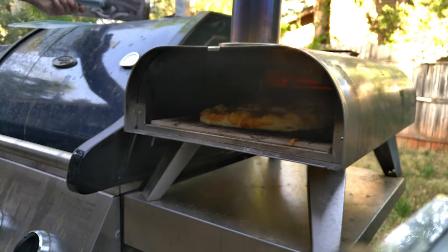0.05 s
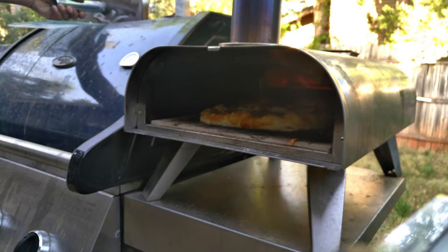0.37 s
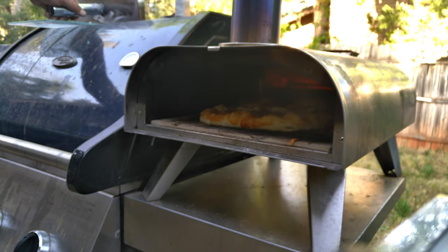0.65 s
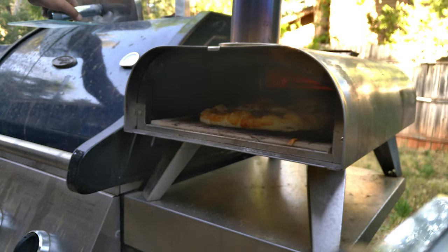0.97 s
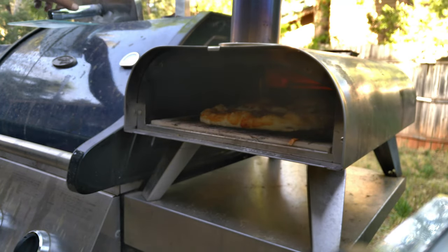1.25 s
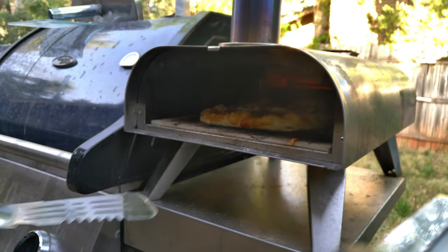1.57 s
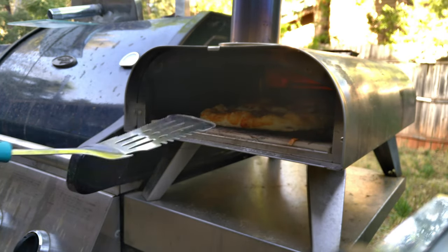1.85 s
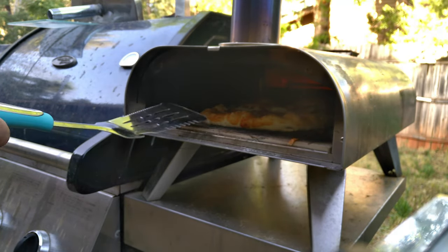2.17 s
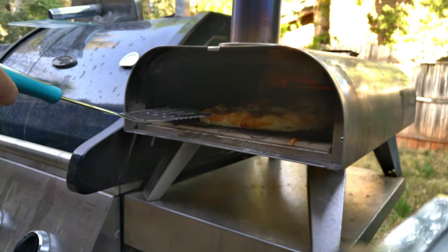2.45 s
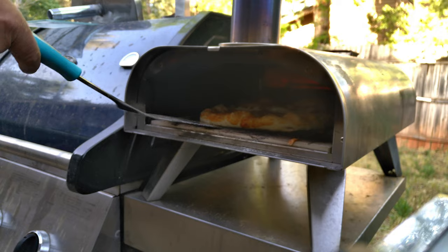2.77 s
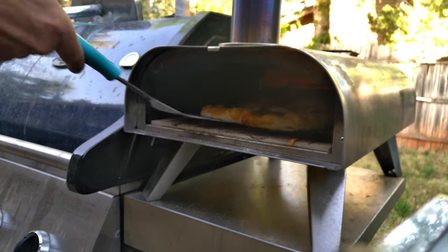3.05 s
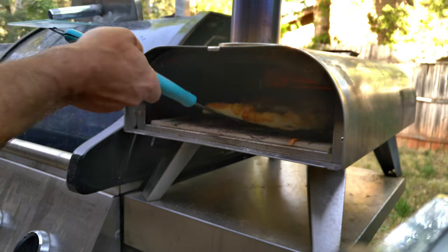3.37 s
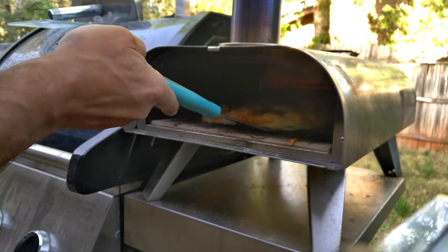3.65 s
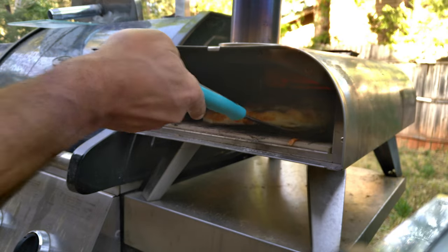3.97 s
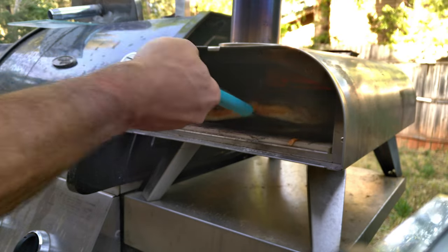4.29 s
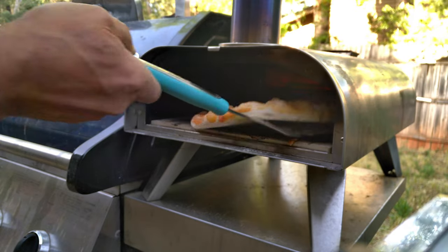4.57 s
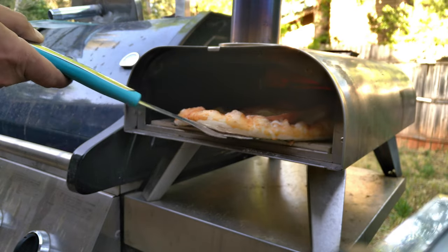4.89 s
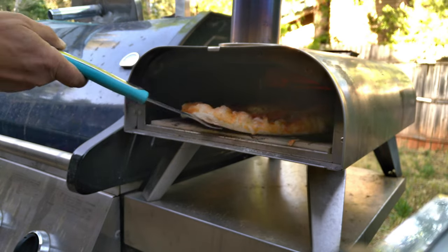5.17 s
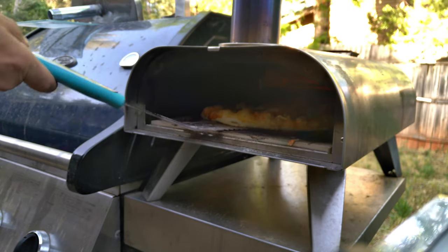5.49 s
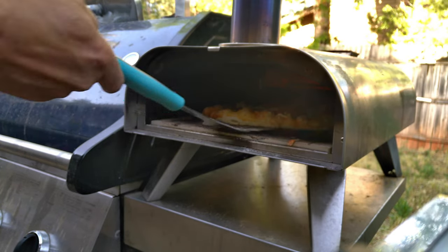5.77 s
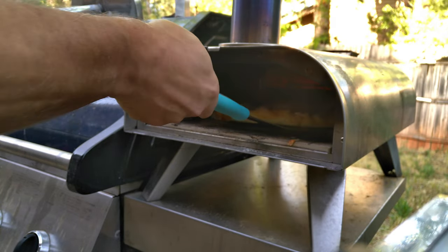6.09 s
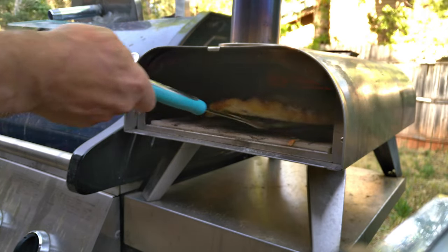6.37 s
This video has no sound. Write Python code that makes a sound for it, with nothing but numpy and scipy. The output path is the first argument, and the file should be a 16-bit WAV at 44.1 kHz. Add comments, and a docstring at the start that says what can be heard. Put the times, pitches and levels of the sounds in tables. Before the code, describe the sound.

A metal spatula scrapes and clanks twice on a steel grill, then scrapes inside a small pizza oven and bangs its shell.

```python
"""Outdoors at a small steel pizza oven. A metal peel drags over the grill beside it and clanks twice
on sheet metal: body, then lid. Its thin blade taps the oven's mouth, scrapes over the gritty floor
under the pizza, bangs the shell once, slides out and goes in again. Slides, shoves and catches drive
the blade; its resonances shift with what it bears on. Faint garden air throughout."""
import sys
import numpy as np
from scipy import signal
from scipy.fft import rfft, irfft, next_fast_len
from scipy.io import wavfile
from scipy.ndimage import uniform_filter1d, map_coordinates

SR = 44100
rng = np.random.default_rng(int(sys.argv[2]) if len(sys.argv) > 2 else 0)


def unload_wav(signal):
    """Save mono or channel-first audio to the path in sys.argv[1] as 16-bit WAV at rate SR, clipped to [-1, 1]."""
    wavfile.write(
        sys.argv[1],
        SR,
        np.round(np.clip(np.atleast_2d(signal).T, -1, 1) * 32767).astype(np.int16),
    )


N = 283563
TIME_S = np.arange(N) / SR
TOP_HZ = 15650

# friction spectrum: (frequency [Hz], level [dB])
FRICTION = [(100, -19.5), (280, -6.5), (600, -5), (1500, -12), (2200, -3.5), (9500, -5), (12000, -1),
            (14700, 7), (15600, 0)]
# even-paced slides: (start [s], end [s], blade [dB], hiss [dB])
SLIDES = [(0, 0.16, -45.5, -44), (0.191, 0.5, -49.5, -47), (0.595, 0.9, -60.5, -55.5),
          (1.763, 1.843, -77, -66.5), (1.904, 2.14, -74.5, -66), (2.125, 2.36, -73, -60),
          (2.283, 2.387, -64, -48.5), (2.671, 3.04, -48, -38.5), (3.049, 3.27, -42, -37),
          (3.28, 3.55, -55, -48.5), (3.636, 3.72, -43.5, -38.5), (3.724, 4.2, -57.5, -50),
          (4.033, 4.09, -50, -51), (4.236, 4.34, -56.5, -52.5), (4.448, 4.58, -59, -63.5),
          (4.715, 5.03, -66, -62.5), (5.083, 5.11, -42, -52), (5.192, 5.47, -57.5, -63),
          (5.69, 5.8, -72, -68), (5.853, 5.925, -54.5, -49), (5.986, 6.11, -62.5, -51.5),
          (6.163, 6.36, -76, -66)]
# the hand leans in until the blade slips: (slip time [s], blade [dB], hiss [dB])
SHOVES = [(2.732, -40.5, -55), (3.07, -34, -27), (4.138, -46, -38), (4.321, -54.5, -43.5),
          (5.418, -44.5, -52.5), (6.08, -68, -43), (6.289, -70.5, -58.5)]
# the edge catches: (time [s], relative hiss [dB], relative blade [dB])
CATCHES = [(0.186, -24, -71), (0.467, -21, -46), (0.552, -22, -37), (0.571, -14, -36), (0.592, -19, -39),
           (1.708, -46, -44.5), (2.106, -58, -63.5), (2.253, -42, -73), (2.292, -30.5, -59),
           (2.569, -41, -87), (2.381, -46, -61), (2.655, -29, -28), (3.156, -19, -33.5), (3.227, -22, -37),
           (3.67, -24, -33.5), (3.874, -31, -37.5), (4.308, -28, -48.5), (5.053, -65, -33.5),
           (5.312, -62, -46.5)]

# blade resonances per contact: (centre [Hz], width [Hz], lift [dB])
ON_GRILL = [(2400, 1650, 11.5), (6300, 2050, 14), (14400, 3500, 15)]
ALONG_GRILL = [(2450, 1800, 9.5), (4500, 680, 11.5), (6600, 1100, 8), (14240, 3500, 22)]
ON_GRILL_LID = [(530, 44, 33), (1420, 230, 25), (3500, 10000, 16), (14200, 5200, 17)]
ONTO_LIP = [(4010, 890, 12.5), (9300, 2730, 2.9)]
ON_LIP = [(1322, 110, 21), (3670, 1040, 13.2), (6800, 4300, 19)]
TIP_DOWN = [(391, 98, 23), (636, 80, 29), (1172, 146, 22), (1990, 120, 13.6), (2600, 170, 10),
            (6800, 900, 6.5)]
GLIDING = [(396, 150, 15.5), (650, 62, 23.6), (4480, 1500, 19.6), (6560, 2300, 22), (8640, 2400, 16.4)]
FLAT_ON_FLOOR = [(354, 58, 22), (638, 200, 17.7), (1100, 76, 27.8), (2700, 540, 3.3), (5870, 1900, 4),
                 (8720, 910, 9.8)]
UNDER_CRUST = [(420, 140, 7.1), (2840, 770, 7.3), (4560, 1300, 11.2), (6290, 1730, 20), (8700, 2400, 14.5)]
PUSHED_HOME = [(413, 80, 9.9), (967, 50, 17), (2600, 590, 5.5), (5120, 2300, 10.3), (8550, 1200, 13.7)]
LOADED = [(2370, 1560, 11.2), (4200, 770, 14), (5100, 660, 12), (7000, 540, 15), (8420, 910, 15.7),
          (14000, 680, 2.3)]
LIFTING = [(2340, 420, 11.6), (4970, 1200, 20), (8600, 1500, 16.3), (11000, 1000, 10), (14200, 1000, 7.6)]
HELD_UP = [(2240, 340, 24), (4100, 400, 10), (4960, 550, 15), (8800, 750, 18)]
DRAWN_BACK = [(534, 490, 27.7), (1280, 280, 22.6), (2260, 770, 21), (3940, 1400, 8.8), (6720, 1000, 11.4),
              (12000, 2400, 7.4)]
LEAVING = [(1210, 320, 10), (2070, 330, 16), (2580, 360, 16.5), (4780, 2700, 11.7), (6960, 740, 4.5),
           (10700, 1300, 9.4)]
GOING_BACK_IN = [(2430, 620, 19), (4570, 320, 15.8), (6000, 1700, 9.8)]
NOSING_UNDER = [(2700, 710, 13.3), (5540, 590, 9.7), (6830, 1300, 12.5), (12960, 2200, 10)]
# contact sequence: (start [s], hollow register gain [dB], resonances)
CONTACTS = [(0, -18, ON_GRILL), (.2, -6, ALONG_GRILL), (.41, 7.5, ON_GRILL_LID), (1.499, 2, ONTO_LIP),
            (2.14, -3.5, ON_LIP), (2.643, -1.5, TIP_DOWN), (2.82, -10.5, GLIDING),
            (2.982, -6.5, FLAT_ON_FLOOR), (3.299, -18.5, UNDER_CRUST), (3.6, -16, PUSHED_HOME),
            (4.029, -18, LOADED), (4.185, -19, LIFTING), (4.38, -11.5, HELD_UP), (5.028, -2.5, DRAWN_BACK),
            (5.299, -13, LEAVING), (5.7, -15, GOING_BACK_IN), (5.99, -9, NOSING_UNDER)]

# taps on the blade, free in air or pressed on the floor: (time [s], level [dB])
FREE_TAPS = [(1.708, -62), (1.795, -60.5)]
PRESSED_TAPS = [(2.653, -36), (3.154, -44), (3.222, -42), (3.672, -57), (3.872, -55), (4.308, -59)]
# blade modes: (frequency [Hz], level [dB], t60 [s])
FREE_MODES = [(1287, -5, .33), (1626, 0, .34)]
PRESSED_MODES = [(2020, -7, .18), (2510, -6, .16), (3970, -6, .11), (5348, 0, .11)]
# blade flexes: (time [s], lower mode [Hz], level [dB], upper mode [Hz], level [dB])
KNOCKS = [(2.672, 650, -36, 1186, -44.5), (3.7, 522, -50.5, 985, -45.5), (3.882, 386, -41.5, 970, -53)]

# blows and rebounds, relative levels: (time [s], clang [dB], boom [dB], crash [dB])
GRILL_BLOWS = [(.178, -43.5, -36.5, -46.5), (.197, -40, -37.5, -55), (.411, -41.5, -37, -41),
               (.445, -40.5, -37.5, -41), (.549, -30.5, -22, -27), (.566, -19.5, -22.5, -23)]
LID_BLOWS = [(.769, -34, -33.5, -37.5), (.7745, -17.5, -20, -22), (.796, -20.5, -26, -28.5)]
OVEN_BLOWS = [(3.214, -43.5, -34, -39.5), (3.68, -57, -60, -44), (3.88, -58.5, -50, -54),
              (4.58, -20.5, -28, -25), (4.602, -19.5, -24, -16.5), (5.055, -83, -46.5, -63.5),
              (5.94, -76, -53.5, -51)]
# strong panel modes: (frequency [Hz], level [dB], t60 [s])
GRILL_MODES = [(214, 0, .36), (322, 0, .27), (392, 0, .33), (479, -1, .24), (588, -2, .3), (688, 0, .17),
               (1325, -3, .24), (1392, -2, .36), (1561, -6, .3)]
LID_MODES = [(304, -6, .33), (472, -13, .42), (528, -4, .26), (565, -10, .52), (655, -9, .4),
             (895, -7, .24), (1378, -10, .28), (1421, 2, .27), (1500, -1, .18), (1550, -7, .28),
             (1618, -6, .22), (1708, -11, .38), (2480, -18, .38), (2596, -11, .2)]
OVEN_MODES = [(285, -14, .6), (400, -13, .55), (465, -8, .44), (492, -8, .38), (544, -16, .62),
              (620, -6, .46), (775, 0, .33), (800, -6, .28), (877, 0, .37), (915, -9, .56), (975, -9, .48),
              (2070, -11, .22), (2607, -9, .22)]
# dense weak modes between them: (frequency [Hz], relative density [dB])
GRILL_WASH = [(50, -35), (95, -16.5), (135, -3.5), (220, -0.5), (1000, -0.5), (1500, 1.5), (2600, -4.5),
              (4500, -12.5), (6000, -15.5), (10500, -23), (14500, -23)]
LID_WASH = [(50, -37.5), (150, -4), (1600, 5.5), (3000, -6.5), (4600, -7), (5200, -19.5), (6700, -15.5),
            (14500, -30.5)]
OVEN_WASH = [(50, -44), (100, -21), (250, -11), (370, 1.5), (850, 3), (1150, -8), (1800, -15.5), (2400, -9),
             (3500, -16), (5000, -12.5), (9000, -21), (14500, -12)]
# their decay: (frequency [Hz], t60 [s])
WASH_T60 = [(150, 0.47), (550, 0.49), (1400, 0.37), (3000, .24), (14000, 0.17)]
# steel-on-steel bites: (time [s], level [dB])
CLASHES = [(0.5685, -23), (0.774, -8), (0.796, -14.5)]
# their shriek: (frequency [Hz], level [dB])
CLASH_PARTIALS = [(1560, -1), (3500, -23), (4400, -18.5)]

# quiet garden: (frequency [Hz], relative density [dB])
AIR_SPECTRUM = [(25, -3), (130, 3), (200, -6), (700, -5), (3000, -18), (15000, -23.5)]


def scrape():
    """Friction sounds through the blade in hollow, blade and hiss registers; the hand trembles."""
    force = grit(slips_per_s=4500, spread_db=3.1, rub_gain=.9)
    force *= amp(.9 * wobble(30, TIME_S) + .5 * wobble(220, TIME_S))
    hz, t, spectra = signal.stft(force, SR, nperseg=1024)
    colour = blade_colour(hz, t) * (hz < TOP_HZ)[:, None]
    below_blade, below_hiss = rolloff(hz, 1600, 16), rolloff(hz, 10500, 14)
    voices = []
    for band in (below_blade, below_hiss - below_blade, 1 - below_hiss):
        gain = colour * band[:, None]
        gain /= np.sqrt(np.mean(gain ** 2, axis=0))
        voices.append(signal.istft(spectra * gain, SR, nperseg=1024)[1][:N])
    starts_s, hollow_db = np.transpose([contact[:2] for contact in CONTACTS])
    current = np.searchsorted(starts_s[1:], TIME_S)
    voices[0] *= uniform_filter1d(amp(hollow_db[current]), size=2000)
    return np.sum(voices * pressure() * amp([[0], [-.5], [-.5]]), axis=0)


def grit(slips_per_s, spread_db, rub_gain):
    """Friction force: tiny uneven slips on a smooth rub."""
    slips = (rng.random(N) < slips_per_s / SR) * rng.standard_normal(N)
    slips *= amp(spread_db * np.clip(rng.standard_normal(N), -2, 2))
    return unit(unit(slips) + rub_gain * rng.standard_normal(N))


def blade_colour(hz, t, wander=.012, lesser_db=3.2, crossfade_s=.14, lip_octaves_per_s=3.04):
    """Gain over frequency and time: resonances drift as the contact point moves."""
    db = along(FRICTION, hz)[:, None] + np.zeros(len(t))
    ends_s = [contact[0] for contact in CONTACTS[1:]] + [np.inf]
    for (start_s, _, peaks), end_s in zip(CONTACTS, ends_s):
        share = np.clip(np.minimum(t - start_s, end_s - t) / crossfade_s + .5, 0, 1)
        held = share > 0
        # riding onto the lip shortens the free length: resonances rise
        glide = 2 ** (lip_octaves_per_s * (t[held] - end_s)) if peaks is ONTO_LIP else 1
        for centre_hz, width_hz, lift_db in peaks:
            peak_hz = centre_hz * glide * (1 + wander * wobble(6.9, t[held]))
            bell = .5 ** ((2 * (hz[:, None] - peak_hz) / width_hz) ** 2)
            db[:, held] += share[held] * lift_db * bell
    grid = np.meshgrid(hz / 280, t * 18, indexing="ij")
    lesser_modes = map_coordinates(rng.standard_normal((90, 130)), grid, order=2)
    return amp(db + lesser_db * lesser_modes)


def pressure(catch_db=-6, hiss_t60_s=.014, blade_t60_s=.091, hollow_lag_s=.048):
    """Drive per register: slides, shoves and a dying jolt at each catch."""
    power = np.zeros((2, N))
    for start_s, end_s, *levels_db in SLIDES:
        slide = swell(start_s, end_s, rise_db_per_s=423, fall_db_per_s=212)
        power += np.outer(amp(levels_db), slide) ** 2
    for s, *levels_db in SHOVES:
        shove = swell(s, s, rise_db_per_s=214, fall_db_per_s=327)
        power += np.outer(amp(levels_db), shove) ** 2
    blade, hiss = np.sqrt(power)
    t = np.arange(SR // 4) / SR
    for s, hiss_db, blade_db in CATCHES:
        add(blade, s, amp(blade_db + catch_db) * decay(t, blade_t60_s))
        add(hiss, s, amp(hiss_db + catch_db) * decay(t, hiss_t60_s))
    step = 1 / (hollow_lag_s * SR)
    hollow = signal.lfilter([step], [1, step - 1], blade)  # low modes swell and fade later
    return np.array([hollow, blade, hiss])


def pings(taps, modes):
    """Sharp contacts ring the thin blade, slightly unsteadily."""
    track, t = np.zeros(N), np.arange(SR // 2) / SR
    for s, tap_db in taps:
        for hz, db, t60_s in modes:
            envelope = amp(tap_db + db + rng.normal(0, 1)) * decay(t, t60_s)
            cycles = hz * t + rng.random() + .21 * wobble(68, t)
            add(track, s, envelope * np.sin(2 * np.pi * cycles))
    return track


def knocks(rise_s=.01, t60_s=.4):
    """The whole blade bends and rings hollow; its two lowest modes shift with the load."""
    track, t = np.zeros(N), np.arange(SR // 2) / SR
    envelope = onset(t, rise_s) * decay(t, t60_s)
    for s, lower_hz, lower_db, upper_hz, upper_db in KNOCKS:
        for hz, db in (lower_hz, lower_db), (upper_hz, upper_db):
            cycles = hz * t + .2 * wobble(60.4, t)
            add(track, s, amp(db) * envelope * np.sin(2 * np.pi * cycles))
    return track


def sheet_metal(blows, modes, spectrum, split_hz, wash_db, crack_gain, crack_t60_s, swing_s, trim_db):
    """Each blow rings a panel; where it lands sets the low boom, mid clang and high crash."""
    track, t = np.zeros(N), np.arange(SR) / SR
    attack = t < .02
    soft_hz, soft_db, db_per_octave = 437, -52, 21.5  # harder blows reach higher modes
    for s, clang_db, boom_db, crash_db in blows:
        ring = sum((-1) ** k * amp(db + rng.normal(0, 1)) * decay(t, t60_s) * np.sin(2 * np.pi * hz * t)
                   for k, (hz, db, t60_s) in enumerate(modes))
        crowd = unit(wash(spectrum)) * (1 + crack_gain * decay(t, crack_t60_s))
        panel = (unit(ring) + amp(wash_db) * crowd) * onset(t, rise_s=.0016)
        boom, clang, crash = registers(panel, *split_hz)
        reach_hz = soft_hz * 2 ** ((boom_db - soft_db) / db_per_octave)
        boom = signal.sosfilt(signal.butter(6, reach_hz, fs=SR, output="sos"), boom)
        boom *= onset(t, swing_s)  # the whole panel is slow to swing
        parts = np.array([boom, clang, crash])
        gains = amp(np.add([boom_db, clang_db, crash_db], trim_db)) / parts[:, attack].std(axis=1)
        add(track, s, gains @ parts)
    return track


def wash(spectrum):
    """One second of dense weak panel modes; the high ones die first."""
    hz, t, spectra = signal.stft(rng.standard_normal(SR), SR, nperseg=256)
    spectra *= decay(t, along(WASH_T60, hz)[:, None])
    tail = signal.istft(spectra, SR, nperseg=256)[1][:SR]
    return filtered(tail, lambda f: amp(along(spectrum, f)))


def clashes(rise_s=.0005, hold_s=.0034, t60_s=.012):
    """Steel bites steel and shrieks, choked as the parts spring apart."""
    track, t = np.zeros(N), np.arange(SR // 20) / SR
    envelope = onset(t, rise_s) * decay(np.maximum(t - hold_s, 0), t60_s)
    for s, clash_db in CLASHES:
        for hz, db in CLASH_PARTIALS:
            cycles = hz * np.cumsum(1 + .045 * wobble(900, t)) / SR
            add(track, s, amp(clash_db + db) * envelope * np.sin(2 * np.pi * cycles))
    return track


def garden_air():
    """Faint steady noise, mostly bass."""
    return amp(-80.5) * unit(filtered(rng.standard_normal(N), lambda hz: amp(along(AIR_SPECTRUM, hz))))


def amp(db):
    """Decibels to gain."""
    return 10 ** (np.asarray(db) / 20)


def unit(x):
    """Scale to rms 1."""
    return x / np.sqrt(np.mean(x ** 2) + 1e-20)


def onset(t, rise_s):
    """Exponential rise to 1."""
    return 1 - np.exp(-t / rise_s)


def decay(t, t60_s):
    """Exponential fall from 1."""
    return amp(-60 * t / t60_s)


def swell(start_s, end_s, rise_db_per_s, fall_db_per_s):
    """Gain 1 from start to end, sloping off outside."""
    db = -rise_db_per_s * np.maximum(start_s - TIME_S, 0) - fall_db_per_s * np.maximum(TIME_S - end_s, 0)
    return amp(db) * (db > -100)


def wobble(knots_per_s, t):
    """Smooth random curve."""
    return map_coordinates(rng.standard_normal(int(N * knots_per_s / SR) + 8), [t * knots_per_s])


def along(points, hz):
    """Interpolate (frequency [Hz], value) points on a log axis."""
    points_hz, values = np.transpose(points)
    return np.interp(np.log(hz + 1), np.log(points_hz + 1), values)


def rolloff(hz, edge_hz, steepness):
    """Low-pass gain, 0.5 at the edge."""
    return 1 / (1 + (hz / edge_hz) ** steepness)


def filtered(x, response):
    """Apply a frequency response."""
    size = next_fast_len(x.shape[-1] + 4096)
    return irfft(rfft(x, size) * response(np.fft.rfftfreq(size, 1 / SR)), size)[..., :x.shape[-1]]


def registers(x, low_hz, high_hz):
    """Split into low, mid and high."""
    low = filtered(x, lambda hz: rolloff(hz, low_hz, 20))
    below_high = filtered(x, lambda hz: rolloff(hz, high_hz, 20))
    return low, below_high - low, x - below_high


def add(track, s, sound):
    """Mix a sound in from time s."""
    room = track[max(round(s * SR), 0):][:len(sound)]
    room += sound[:len(room)]


def scene():
    """Steel panels, blade and air, mono."""
    grill = sheet_metal(GRILL_BLOWS, GRILL_MODES, GRILL_WASH, split_hz=(900, 1870), wash_db=1,
                        crack_gain=2, crack_t60_s=.11, swing_s=.0028, trim_db=[-2, -3, -2])
    lid = sheet_metal(LID_BLOWS, LID_MODES, LID_WASH, split_hz=(1270, 1980), wash_db=-4.5,
                      crack_gain=2, crack_t60_s=.13, swing_s=.0028, trim_db=[-2, -3, -2])
    oven = sheet_metal(OVEN_BLOWS, OVEN_MODES, OVEN_WASH, split_hz=(671, 1684), wash_db=-.5,
                       crack_gain=.66, crack_t60_s=.18, swing_s=.014, trim_db=[-2, -2, -3])
    blade = scrape() + pings(FREE_TAPS, FREE_MODES) + pings(PRESSED_TAPS, PRESSED_MODES) + knocks()
    air = garden_air()
    shrieks = clashes() + clashes()  # two layers, independent jitter
    return (blade + grill + lid + oven + shrieks + air)[None]


def record(dry):
    """Small microphone: deep bass lost, band-limited at TOP_HZ."""
    thin = signal.sosfilt(signal.butter(1, 70, "highpass", fs=SR, output="sos"), dry)
    return filtered(thin, lambda hz: rolloff(hz, TOP_HZ, 160))


dry = scene()
out = record(dry)
unload_wav(out)
```